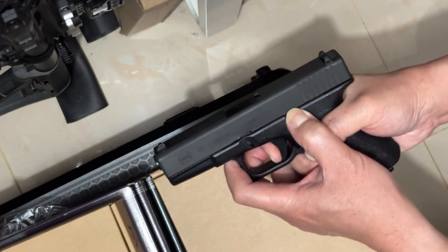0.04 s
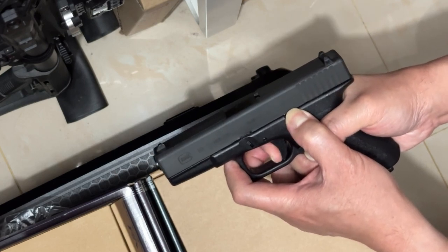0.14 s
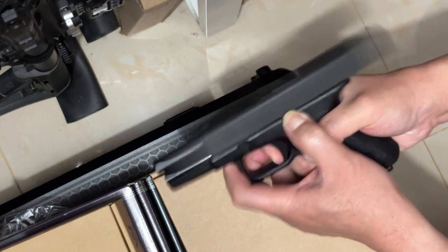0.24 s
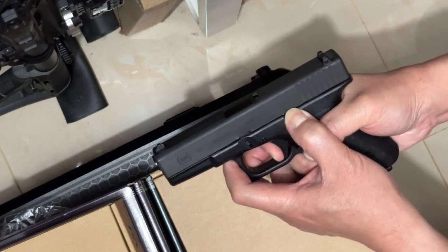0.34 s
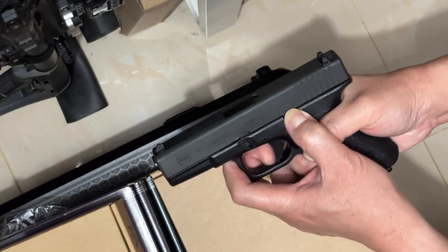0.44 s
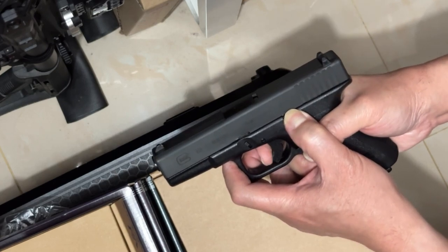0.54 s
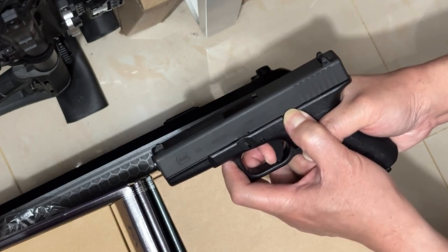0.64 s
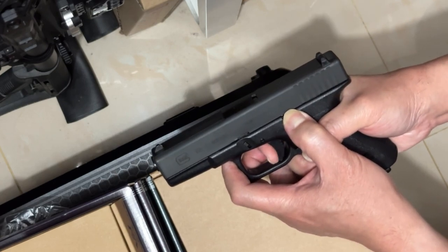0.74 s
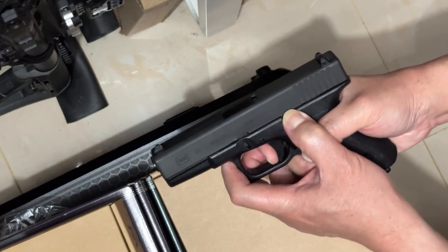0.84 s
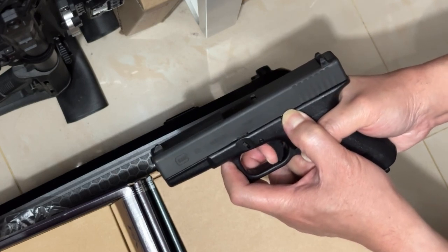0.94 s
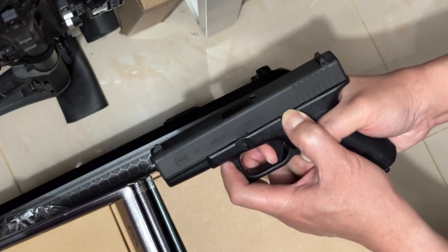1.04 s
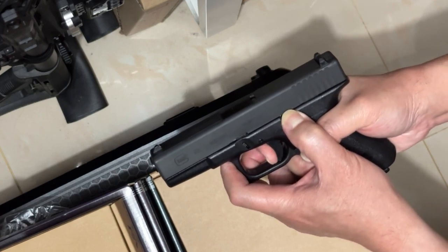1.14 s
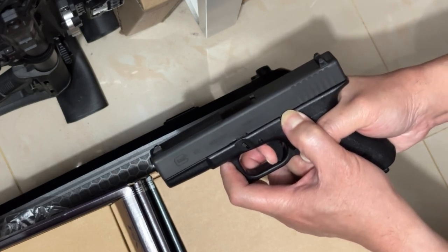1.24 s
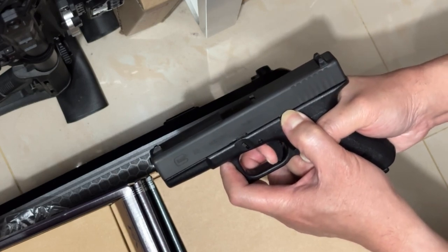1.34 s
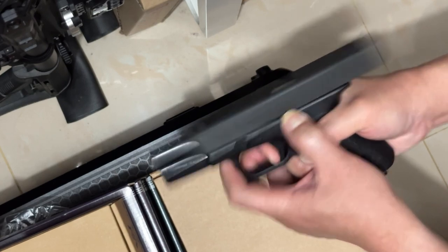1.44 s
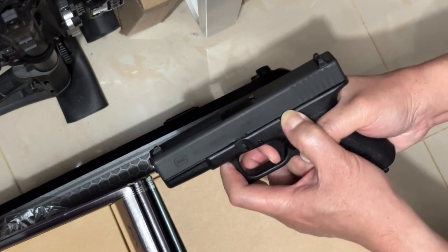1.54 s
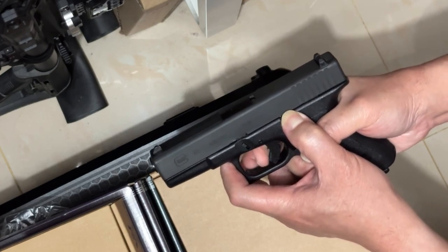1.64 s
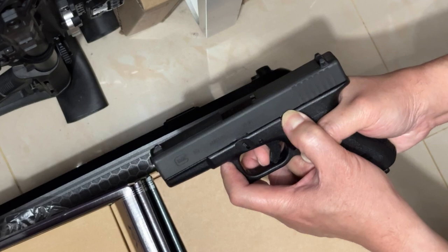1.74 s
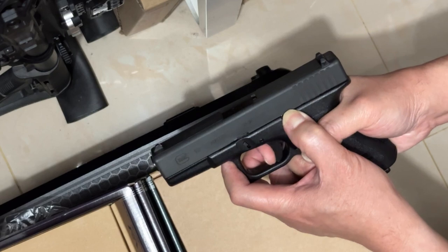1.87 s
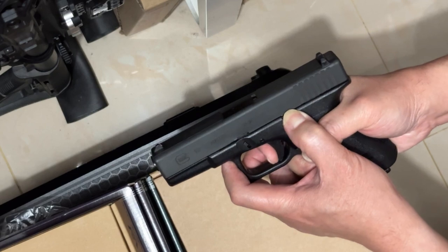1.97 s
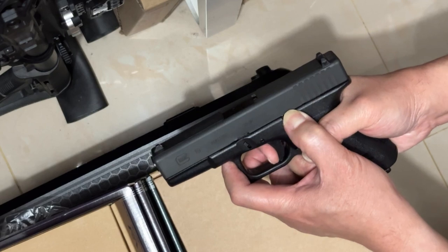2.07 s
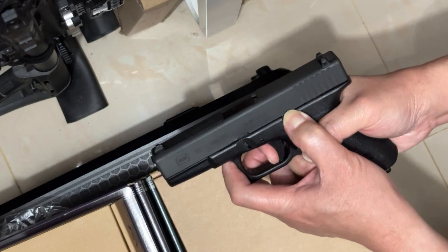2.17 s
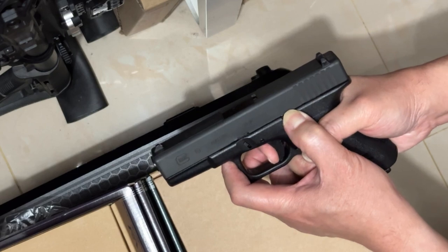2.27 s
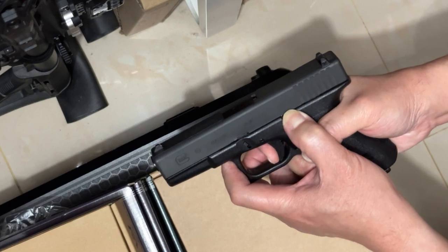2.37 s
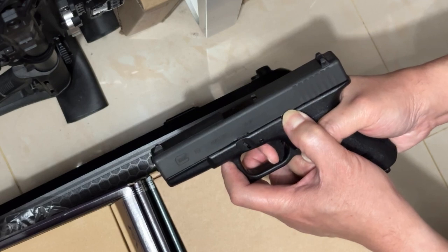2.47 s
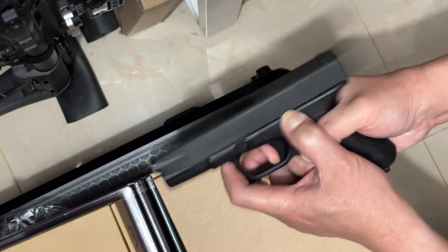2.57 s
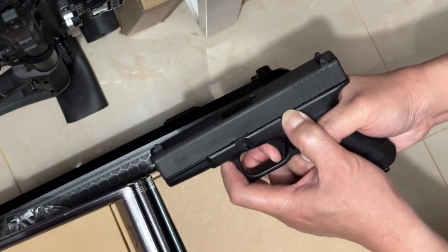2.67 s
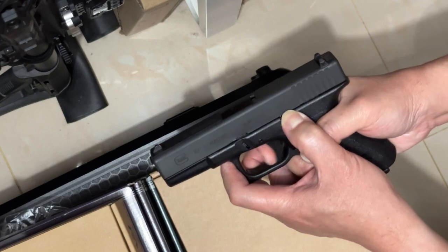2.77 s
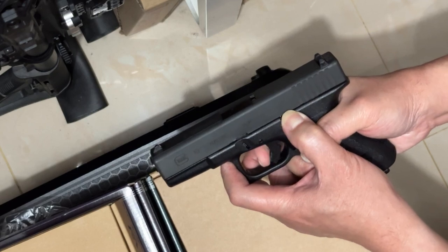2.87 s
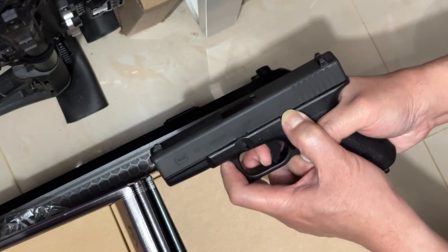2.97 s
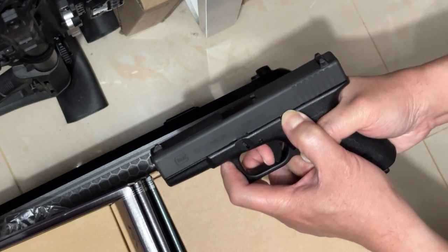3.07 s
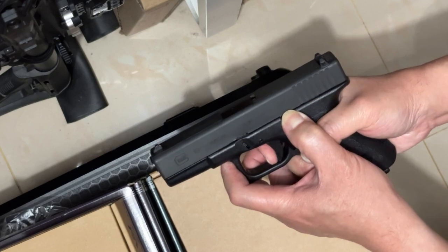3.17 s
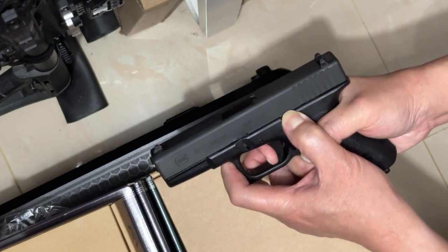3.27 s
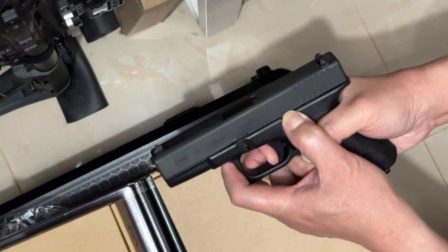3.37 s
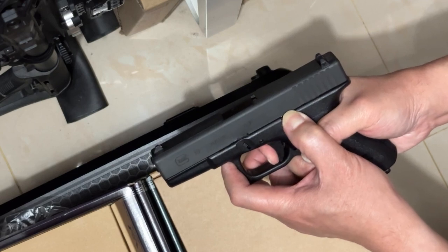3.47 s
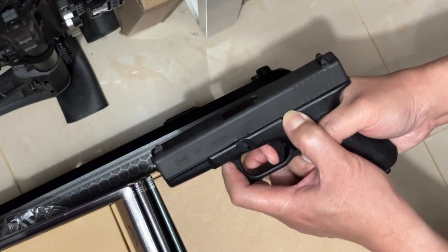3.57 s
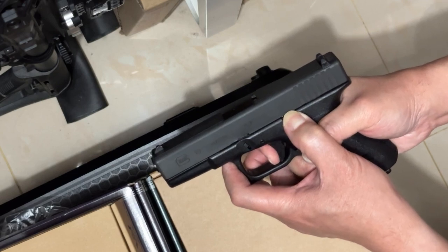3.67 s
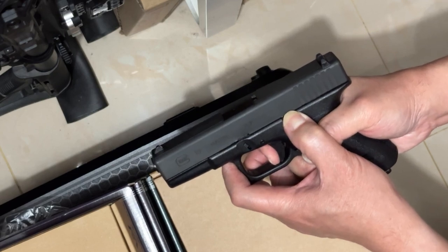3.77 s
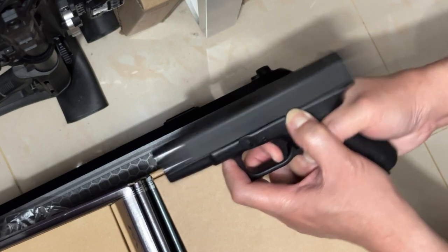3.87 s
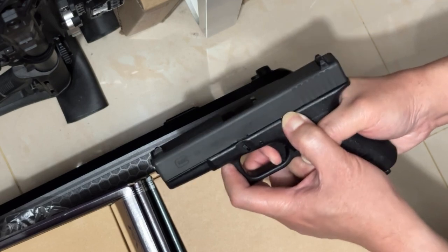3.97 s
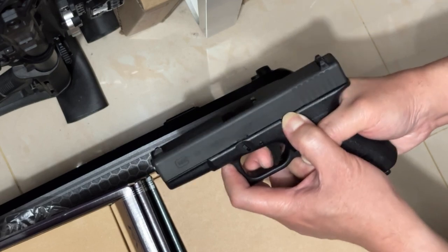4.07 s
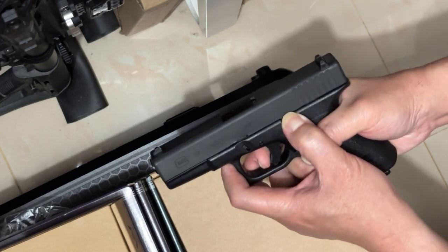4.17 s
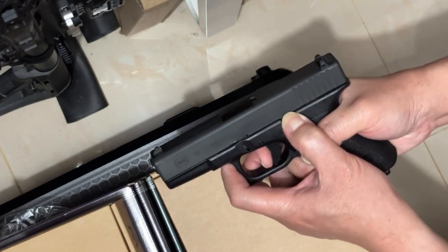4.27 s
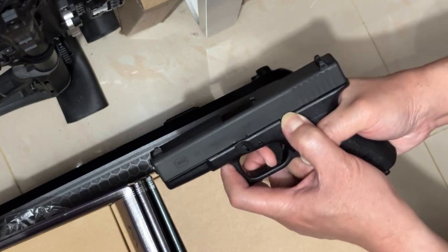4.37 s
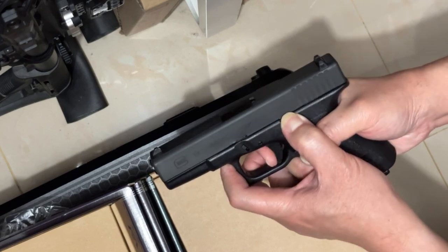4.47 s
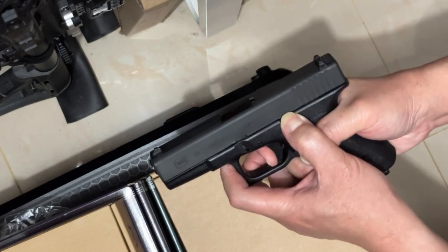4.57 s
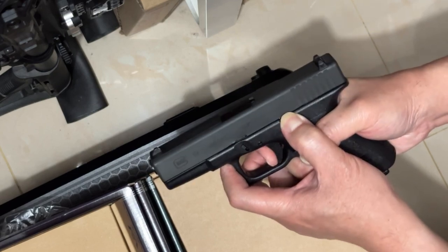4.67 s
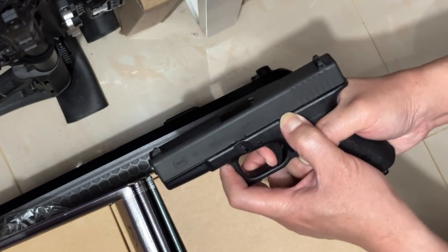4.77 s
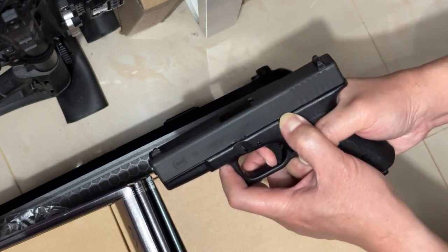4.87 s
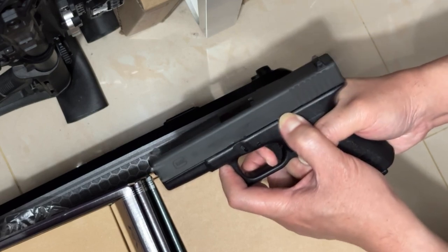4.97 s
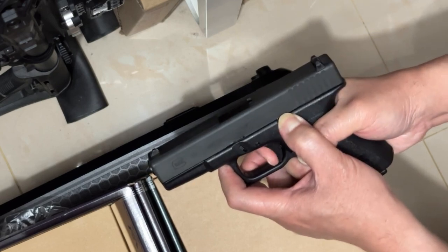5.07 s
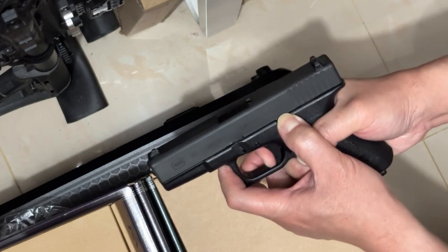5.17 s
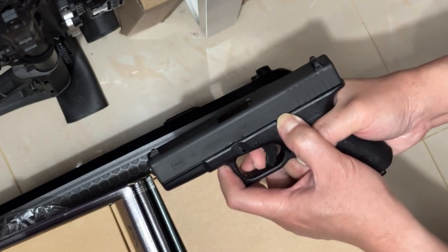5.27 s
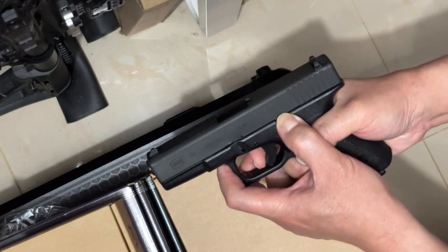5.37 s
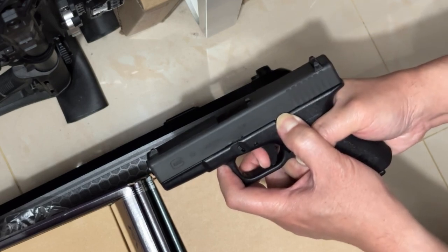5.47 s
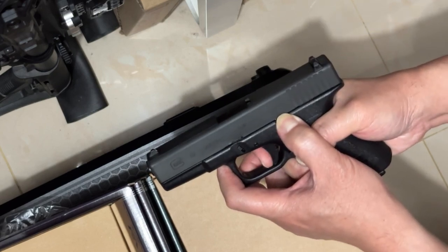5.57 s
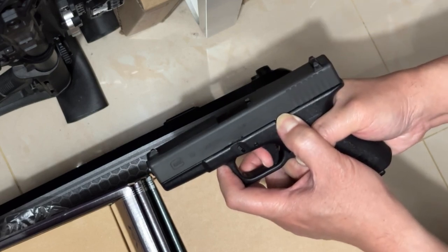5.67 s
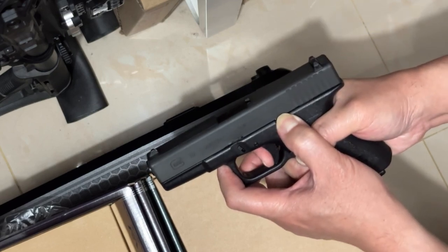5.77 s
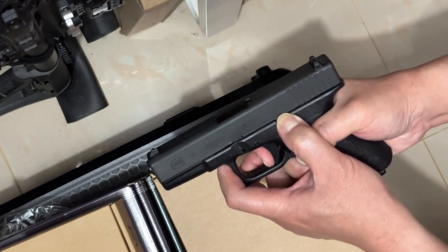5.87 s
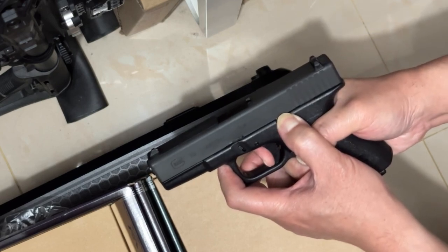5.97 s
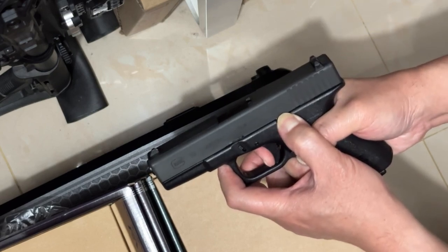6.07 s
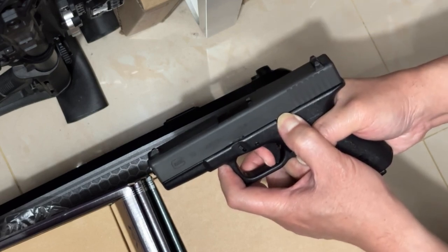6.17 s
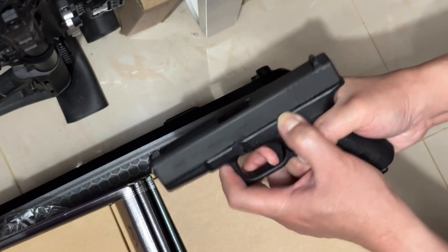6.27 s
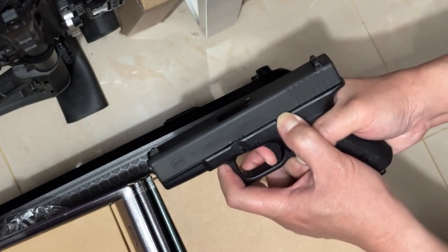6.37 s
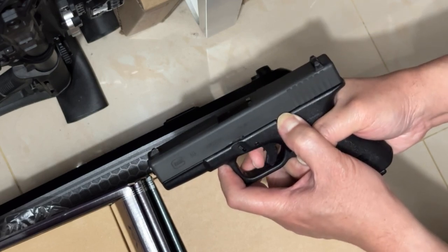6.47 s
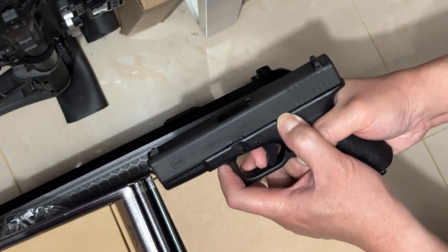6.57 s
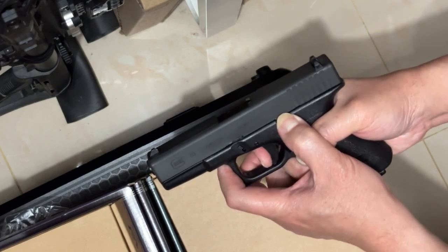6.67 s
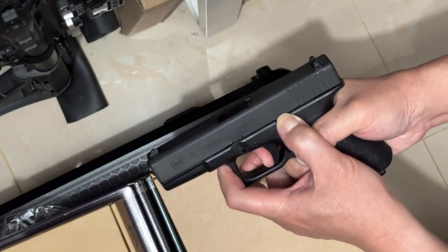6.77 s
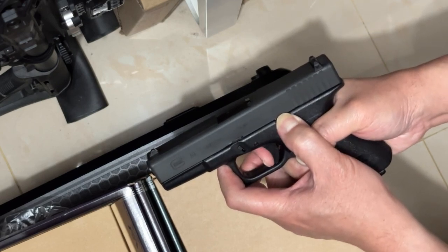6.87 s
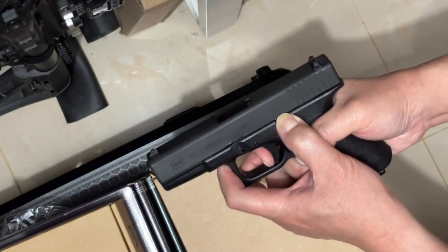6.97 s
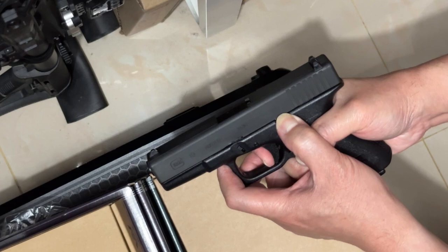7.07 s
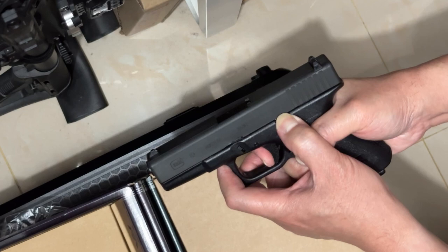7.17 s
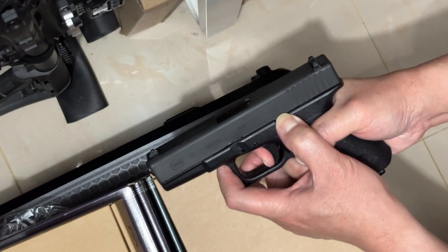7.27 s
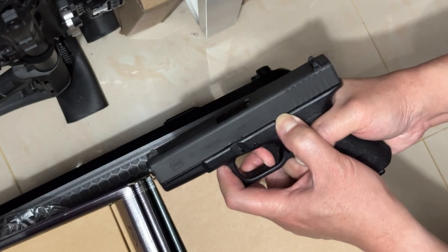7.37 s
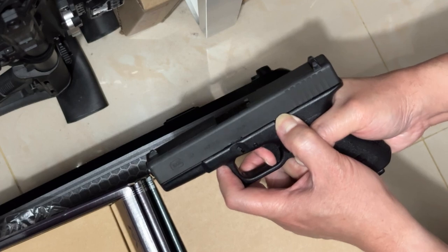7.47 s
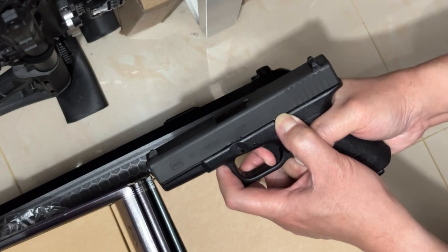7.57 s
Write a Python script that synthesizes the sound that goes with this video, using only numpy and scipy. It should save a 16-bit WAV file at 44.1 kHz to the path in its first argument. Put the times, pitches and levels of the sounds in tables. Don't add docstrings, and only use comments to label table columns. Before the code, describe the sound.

Close in a small quiet room, a gas model pistol cycles seven times, roughly every 1.2 seconds. Each shot is a brief hammer scrape, a sharp valve bang with a ringing gas spit, then the slide slamming home. Soft trigger ticks follow each of the first six shots. Short wall reflections, faint hum and hiss; phone stereo at arm's length.

```python
import sys
import numpy as np
from scipy import signal
from scipy.fft import rfft, irfft
from scipy.io import wavfile
from scipy.ndimage import uniform_filter1d

SR = 44100
rng = np.random.default_rng(int(sys.argv[2]) if len(sys.argv) > 2 else 0)


def waveform_to_disk(signal):
    frames = np.transpose(np.atleast_2d(signal))
    scaled = np.clip(frames, -1, 1) * 32767
    samples = np.round(scaled).astype(np.int16)
    wavfile.write(sys.argv[1], SR, samples)


def boost_factor(decibels):
    exponent = np.asarray(decibels, float) / 20
    return 10 ** exponent


N = 336042
MS = .001
TAPS, PIECE = 8192, 6000
T = np.arange(PIECE) / SR
SIDES = np.array([[1], [-1]])

# [f/Hz, level/dB]
ROOM_TONE = [(48, -0.5), (107, -3.5), (164, -7), (257, -8.5), (447, -19.5), (590, -18), (720, -30),
             (1100, -26.5), (2050, -33), (2800, -26.5), (4500, -30), (6500, -39.5), (7800, -34.5),
             (11500, -45)]
# [f/Hz, likeness 0-1]
ROOM_ALIKE = [(60, .9), (290, .8), (700, .5), (1300, .5), (1650, .998)]
# [f/Hz, level/dB]
WALLS = [(600, 2.5), (950, -10), (1500, -4.5), (2400, -0.5), (4000, -3.5), (7000, -0.5), (12000, 1)]

# [t/s, peak level/dB]
EASES = [
    (0.407, -38),
    (1.5934, -36),
    (2.757, -39),
    (3.159, -57),
    (4.0113, -39),
    (5.1643, -39),
    (6.3957, -39),
]
# [t/s, slip level/dB, gap/ms, catch level/dB, brightness/dB]
RESETS = [
    (0.4493, -32, 10.3, -36, 1),
    (1.631, -30.5, 4.9, -30.5, -1),
    (2.8072, -31, 11.4, -34.5, -1),
    (4.0753, -36, 12.6, -34, 5),
    (5.2321, -35.5, 14, -34.5, 5.5),
    (6.4372, -34.5, 12.5, -32, 3.5),
]
# [t/s, stop level/dB, gap/ms, tab level/dB, brightness/dB]
STOPS = [
    (0.63, -33, 3.7, -30.5, -3.5),
    (1.849, -32, 4, -33, -2.5),
    (3.0767, -27.5, 5.1, -34, -2.5),
    (4.3039, -34.5, 2.1, -29, 0),
    (5.4781, -29.5, 3.4, -31, -0.4),
    (6.6465, -30, 2.8, -39, -6.5),
]
# [f/Hz, level/dB]
TICK_COLOUR = [(300, -54.5), (680, -26), (850, -8), (1500, -2), (2100, -6.5), (3000, -3.5), (5200, -2.5),
               (7500, 0.5), (16000, -4)]
# two strongest notes f/Hz, chatter length/s
EASE = (3700, 3000, .0065)
SLIP = (1600, 6450, .007)
CATCH = (1600, 2950, .0065)
STOP = (1600, 2850, .0058)
TAB = (3700, 2260, .0066)

# [t/s, peak level/dB]
HAMMERS = [
    (0.2442, -10),
    (1.4256, -7.5),
    (2.5871, -7.5),
    (3.8456, -7.5),
    (4.9932, -8.5),
    (6.224, -10),
    (7.397, -7.5),
]
# [t/s, peak level/dB, frame note f/Hz, brightness/dB]
SLAMS = [
    (0.2988, -7, 1507, 1.5),
    (1.48, -7, 1620, 2),
    (2.641, -7.5, 1530, 2),
    (3.8993, -7.5, 1613, 2),
    (5.0467, -3.5, 1560, 0),
    (6.2796, -5.5, 1713, -0.5),
    (7.4492, -6.5, 1567, 3.5),
]
# [t/s, peak level/dB, gas level/dB, rear stop level/dB, rattle level/dB]
BANGS = [
    (0.2569, -13.5, 1.5, 1.5, -1),
    (1.4378, -9, 0.5, -1.5, -0.5),
    (2.5997, -7, -1, -1, -3.5),
    (3.8578, -10, 0.5, -3.5, 0),
    (5.0051, -9, 3.5, 1, 3),
    (6.2375, -10.5, 1, 1.5, 1.5),
    (7.4084, -10.5, 2.5, 3.5, 1.5),
]
# [t after the bang/ms, level/dB]
REAR_STOP = [
    (14.5, -6),
    (18.5, -1.5),
]
# [f/Hz, level/dB, t60/s]
NOZZLE = [(6835, 0, .06), (7090, -4, .05), (7200, -3, .06), (7565, -8, .04), (6625, -8, .04),
          (7905, -10, .03), (6300, -15, .03)]
# [f/Hz, level/dB, t60/s, build-up/s]
GRIP = [(56.36, -16.5, 0.12, 0.0071), (128, -8.5, 0.063, 0.0047), (221, 4, 0.043, 0.023),
        (264, 2, 0.027, 0.0041), (536, 3, 0.024, 0.004), (393, -4, .03, 0.0026), (812, 1, 0.016, 0.0011)]
# [f/Hz, level/dB, t60/s]
SLIDE = [(1273, -6.5, 0.035), (1343, -4, 0.034), (1520, -10.5, 0.015), (1704, -2, 0.02), (2234, -8, 0.036),
         (2744, -3.5, 0.018), (3240, -4.5, 0.026), (3683, -6.5, 0.062), (4410, -2.5, 0.021),
         (5400, -6.5, 0.024), (6280, -5.5, 0.013), (7280, -10, 0.073), (7500, -11, 0.016)]
# [f/Hz, level/dB]
GAS_COLOUR = [(300, -28.5), (900, -14), (1600, -8), (2500, -9), (4000, -10.5), (5500, -4), (7000, 0),
              (8200, -4.5), (16000, -4.5)]
# [f/Hz, level/dB]
CRACK_COLOUR = [(300, -35.5), (900, -14.5), (1300, -1), (1700, -2), (3000, 0), (5000, -2.5), (7500, -2),
                (16000, -1.5)]

# [f/Hz, level/dB]
PORT_COLOUR = [(15, -33), (40, -1), (100, 3.5), (7800, 1.5), (9000, 0.5), (10200, -5.5), (11800, -18.5),
               (14500, -9.5), (15600, -4), (16300, -31.5), (17200, -82)]
# [f/Hz, left minus right/dB]
PORT_BALANCE = [(60, 0), (200, -4), (500, -6), (700, -5), (870, -13), (1050, 0), (20000, 0)]
# [f/Hz, left lead/rad]
PORT_PHASE = [(100, -.15), (250, -.45), (620, 0), (1150, -2.1), (1500, 0), (2400, 0), (3500, -.75),
              (5500, 0), (8100, 0), (9000, 3.1), (10200, 3.2), (11800, 6.2), (13000, 6.4), (14600, 9.4)]


def on_axis(table):
    hz, value = np.transpose(table)
    axis_hz = np.maximum(np.fft.rfftfreq(TAPS, 1 / SR), 1)
    return np.interp(np.log(axis_hz), np.log(hz), value)


def colour(x, table):
    ceps = irfft(np.log(boost_factor(on_axis(table))))
    ceps[1:TAPS // 2] *= 2
    ceps[TAPS // 2 + 1:] = 0
    response = irfft(np.exp(rfft(ceps)))
    response = np.broadcast_to(response, x.shape[:-1] + (TAPS,))
    return signal.oaconvolve(x, response, axes=-1)[..., :N]


def centred(x, gain):
    response = np.roll(irfft(gain), TAPS // 2)
    return signal.oaconvolve(x, response)[TAPS // 2:TAPS // 2 + N]


def butter(x, order, cut_hz, kind="low"):
    return signal.sosfilt(signal.butter(order, cut_hz, kind, fs=SR, output="sos"), x)


def thin(x, cut_hz):
    return butter(x, 4, cut_hz, "high")


def add(out, s, piece):
    i = int(s * SR)
    out[i:i + len(piece)] += piece[:len(out) - i]


def rise(rise_s):
    return 1 - np.exp(-T / rise_s)


def fall(t60):
    return np.exp(-np.log(1000) * T / t60)


def burst(rise_s, t60):
    return rng.standard_normal(PIECE) * rise(rise_s) * fall(t60)


def ring(modes, scatter_db, detune):
    hz, db, t60 = np.transpose(modes)[:, :, None]
    pitch_luck, level_luck = rng.standard_normal((2, len(modes), 1))
    waves = np.sin(2 * np.pi * hz * (1 + detune * pitch_luck) * T)
    return np.sum(boost_factor(db + scatter_db * level_luck) * fall(t60) * waves, axis=0)


def room_tone():
    shared, apart = colour(rng.standard_normal((2, N)), ROOM_TONE)
    alike = on_axis(ROOM_ALIKE)
    pair = centred(shared, np.sqrt(1 + alike)) + centred(apart, np.sqrt(1 - alike)) * SIDES
    steps = np.repeat(rng.standard_normal(N // TAPS + 1), TAPS)[:N]
    swell_db = .7 * uniform_filter1d(steps, TAPS)
    lean_db = 0.5 * SIDES
    return pair * boost_factor(-61 + lean_db + swell_db) / np.std(pair)


def room(x):
    shared, apart = rng.standard_normal((2, PIECE)) * rise(0.0011)
    apart = 0.18 * apart + 2.8 * butter(apart, 2, (700, 1200), "band")
    noise = shared + apart * SIDES
    low = butter(noise, 2, 600)
    tail = boost_factor(-33.5) * fall(0.13) * (noise - low) + boost_factor(-42.0) * fall(0.1) * low
    return signal.oaconvolve(colour(x, WALLS)[None], tail, axes=-1)[:, :N]


def contacts():
    ease_bright_db, second_duller_db = 1, 2.5
    rows = [(s, db, *EASE, ease_bright_db) for s, db in EASES]
    rows += [(s - 10.5 * MS, -56, *EASE, ease_bright_db) for s, *_ in RESETS]
    for pairs, first, second in ((RESETS, SLIP, CATCH), (STOPS, STOP, TAB)):
        for s, db, gap_ms, second_db, bright_db in pairs:
            rows.append((s, db, *first, bright_db))
            rows.append((s + gap_ms * MS, second_db, *second, bright_db - second_duller_db))
    return sorted(rows)


def ticks():
    dull, bright, body = np.zeros((3, N))
    for s, db, note_hz, other_hz, chatter_s, bright_db in contacts():
        click = burst(rise_s=0.00029, t60=5.5 * chatter_s)
        rustle = boost_factor(-15) * burst(rise_s=.004, t60=.13)
        contact = boost_factor(db - 3.0) * (click + rustle)
        add(dull, s, contact)
        add(bright, s, boost_factor(bright_db) * contact)
        notes = [(note_hz, -1.5, .018), (other_hz, 0.5, .022)]
        add(body, s, boost_factor(db - 14.0) * ring(notes, scatter_db=4.5, detune=0))
        for late, size in rng.random(size=(3, 2)):
            touch = ring(SLIDE, scatter_db=4.5, detune=0.0287)
            add(body, s + late * chatter_s, boost_factor(db - 19 - 2.9 * size) * touch)
    click = butter(dull - bright, 2, 4800) + bright
    return colour(click, TICK_COLOUR) + thin(body, cut_hz=900)


def hammer():
    scrape, body = np.zeros((2, N))
    notes = [(1670, -3.0, 0.044), (670.0, -6.0, 0.063), (294, -12.5, 0.027)]  # (f/Hz, level/dB, t60/s)
    for (s, db), bang in zip(HAMMERS, BANGS):
        moving = T < bang[0] - s + .0026
        rub = moving * rise(0.0035) ** 3 * burst(rise_s=0.00084, t60=0.085)
        add(scrape, s - .0018, boost_factor(db - 7) * rub)
        add(body, s + 0.0042, boost_factor(db - 23.5) * ring(notes, scatter_db=2.5, detune=0.035))
    return colour(scrape, CRACK_COLOUR) + body


def slam():
    crack, body = np.zeros((2, N))
    for s, db, note_hz, bright_db in SLAMS:
        add(crack, s - .001, boost_factor(db + bright_db - 1.5) * burst(rise_s=0.0039, t60=.07))
        add(crack, s + .0006, boost_factor(db + bright_db - 4.0) * burst(rise_s=.0003, t60=0.023))
        note = rise(0.0016) * ring([(note_hz, 0, .014)], scatter_db=2.0, detune=0)
        add(body, s, boost_factor(db + 2.5) * note)
        sagged = rise(0.0015) * ring([(.86 * note_hz, 0, .014)], scatter_db=1.8, detune=0)
        add(body, s + .003, boost_factor(db - 4.5) * sagged)
        for late_s, late_db in ((-.003, -21), (0, -17), (.002, -13.5), (.016, -27.5)):
            add(body, s + late_s, boost_factor(db + late_db) * ring(SLIDE, scatter_db=2.5, detune=0.022))
    return thin(colour(crack, CRACK_COLOUR) + body, cut_hz=1050)


def gas_db(ms):
    blast_ms, shut_ms, shutting_ms, empty_ms = 5, 28.5, 3.4, 42
    swell = -8 + 0.3162 * (np.minimum(ms, shut_ms) - blast_ms)
    shut = np.clip((ms - shut_ms) / shutting_ms, 0, 1)
    trickle_db = -8.5
    rush = (1 - shut) * swell + shut * trickle_db
    rush = rush - 3 * np.maximum(ms - empty_ms, 0)
    return np.where(ms < blast_ms, -3.5, rush)


def gas_rush():
    puffs = boost_factor(17 * uniform_filter1d(rng.standard_normal(PIECE), size=64))
    return boost_factor(gas_db(T / MS)) * puffs * rng.standard_normal(PIECE)


def thud():
    return sum(rise(rise_s) ** 2 * ring([mode], scatter_db=2.38, detune=0.0069) for *mode, rise_s in GRIP)


def stroke():
    crack, gas, body, grip = np.zeros((4, N))
    choke = boost_factor(-17 / (1 + np.exp(-(T - .006) / .0005)))
    buffer_notes = [(213, 0.5, 0.018), (623, -0.5, 0.0044)]  # (f/Hz, level/dB, t60/s)
    for s, db, rush_db, stop_db, rattle_db in BANGS:
        s = s + .0008
        add(crack, s, boost_factor(db + 4.0) * burst(rise_s=.0001, t60=0.021))
        ring_db = 1.1 * (db + 10.5)
        nozzle = choke * rise(0.00083) * ring(NOZZLE, scatter_db=3.2, detune=0.0023)
        add(body, s + .0002, boost_factor(ring_db - 8.5) * nozzle)
        add(gas, s, boost_factor(rush_db - 9.5) * gas_rush())
        add(crack, s + .017, boost_factor(stop_db - 15.5) * burst(rise_s=.0002, t60=0.014))
        add(body, s + 0.016, boost_factor(stop_db - 21.5) * ring(NOZZLE, scatter_db=0.5, detune=0.0013))
        for late_s in (.010, .014, .022, .026, .033):
            add(body, s + late_s, boost_factor(rattle_db - 27.0) * ring(SLIDE, scatter_db=5.0, detune=0.033))
        add(grip, s, boost_factor(-12) * thud())
        for blow_ms, blow_db in REAR_STOP:
            blow = ring(buffer_notes, scatter_db=1.17, detune=.005)
            add(grip, s + blow_ms * MS, boost_factor(blow_db - 21.5) * blow)
    return colour(crack, CRACK_COLOUR) + colour(gas, GAS_COLOUR) + thin(body, cut_hz=1200) + grip


def scene():
    pistol = hammer() + stroke() + slam() + ticks()
    return pistol + room(pistol) + room_tone()


def low_pass(x):
    return signal.sosfilt(signal.butter(12, 17150, fs=SR, output="sos"), x)


def record(dry):
    keep = np.exp(-1 / (.12 * SR))
    loudness = signal.lfilter([1 - keep], [1, -keep], np.abs(dry).mean(axis=0))
    left, right = colour(dry / (1 + 9 * loudness), PORT_COLOUR)
    tilt = boost_factor(on_axis(PORT_BALANCE) / 2) * np.exp(.5j * on_axis(PORT_PHASE))
    ports = np.array([centred(left, tilt), centred(right, 1 / tilt)])
    limited = ports / (1 + (ports / .8) ** 6) ** (1 / 6)
    top = signal.ellip(8, .2, 70, 16800, fs=SR, output="sos")
    return low_pass(signal.sosfilt(top, limited))


dry = scene()
out = record(dry)
waveform_to_disk(out)
```